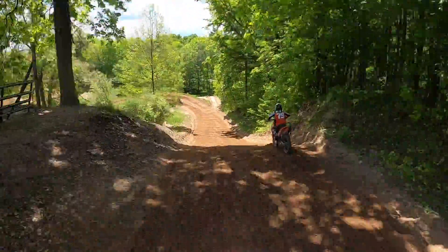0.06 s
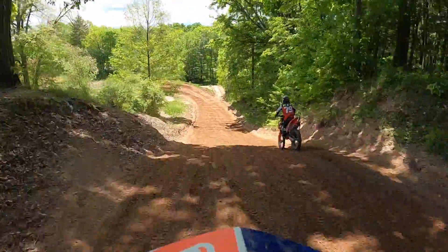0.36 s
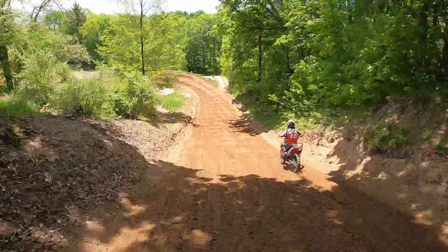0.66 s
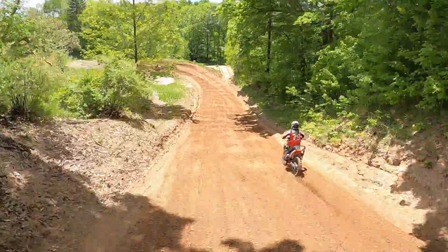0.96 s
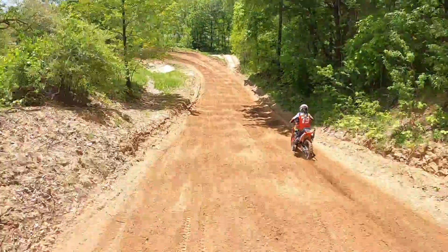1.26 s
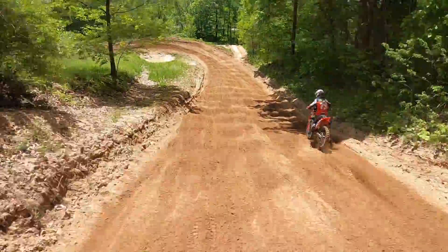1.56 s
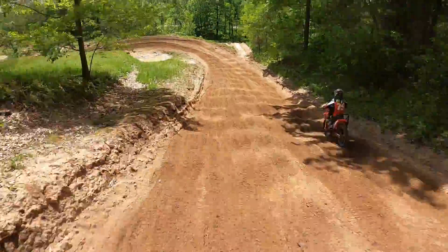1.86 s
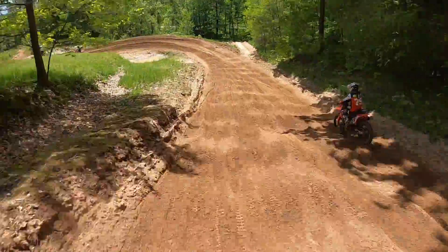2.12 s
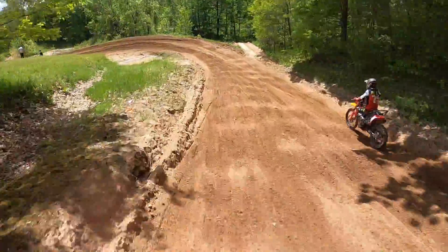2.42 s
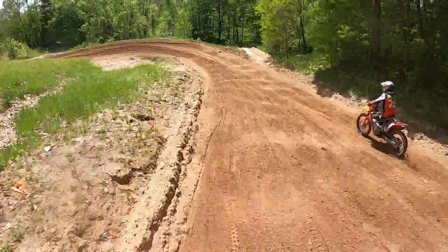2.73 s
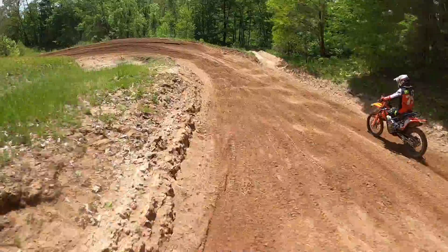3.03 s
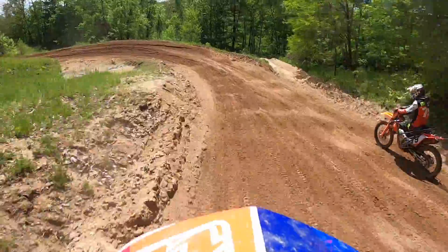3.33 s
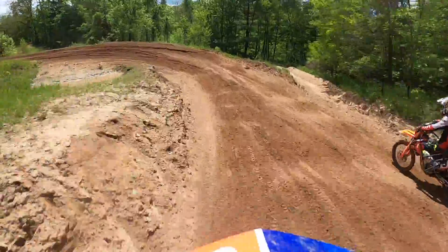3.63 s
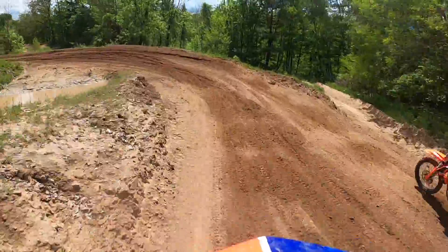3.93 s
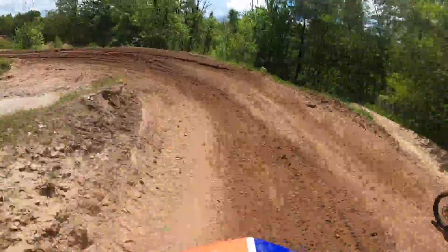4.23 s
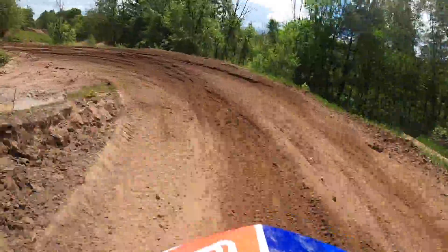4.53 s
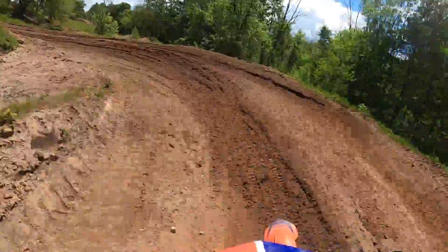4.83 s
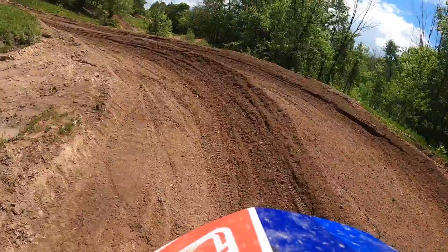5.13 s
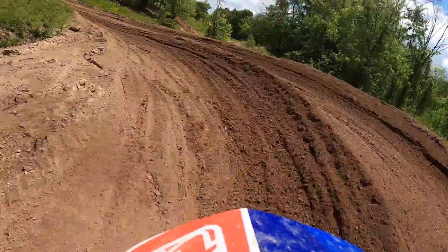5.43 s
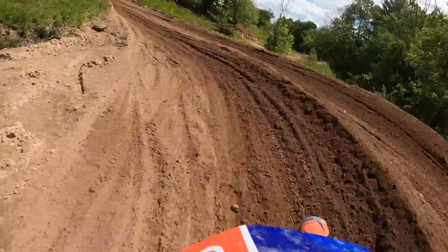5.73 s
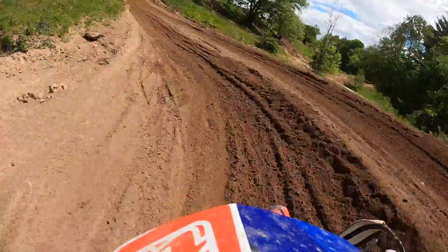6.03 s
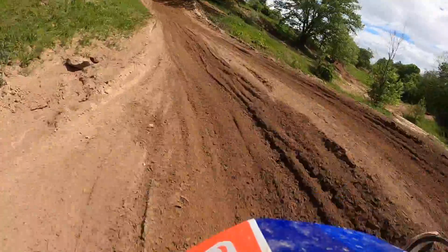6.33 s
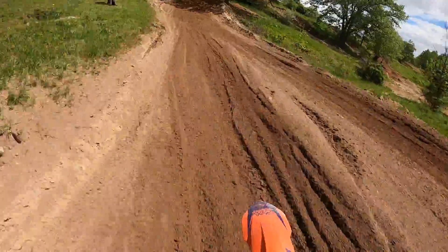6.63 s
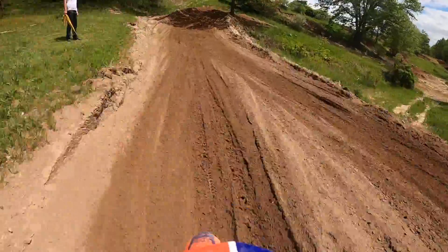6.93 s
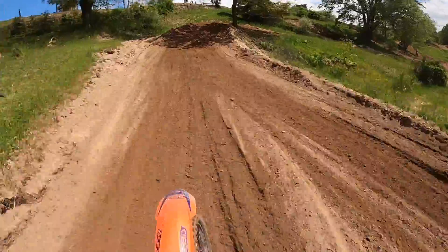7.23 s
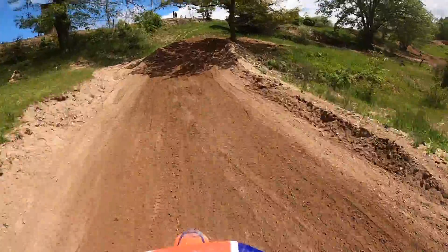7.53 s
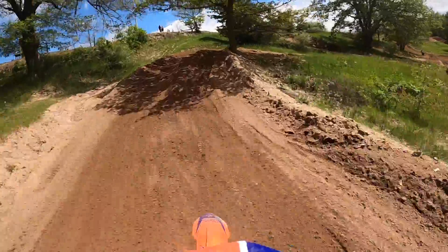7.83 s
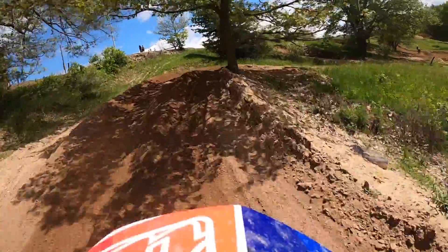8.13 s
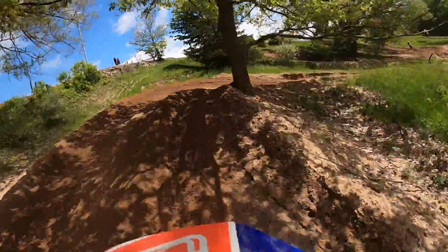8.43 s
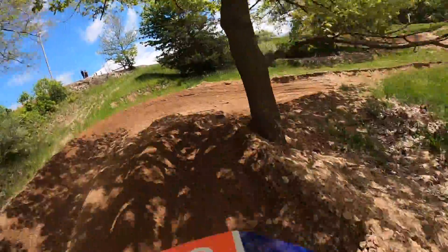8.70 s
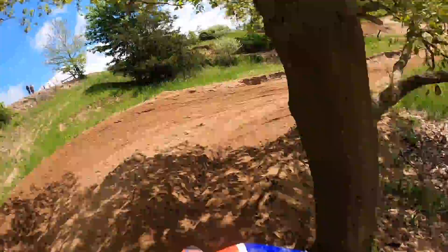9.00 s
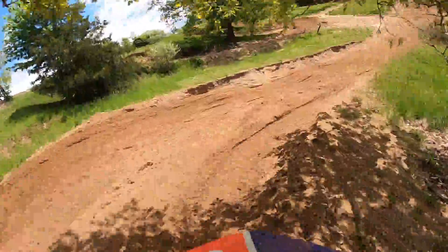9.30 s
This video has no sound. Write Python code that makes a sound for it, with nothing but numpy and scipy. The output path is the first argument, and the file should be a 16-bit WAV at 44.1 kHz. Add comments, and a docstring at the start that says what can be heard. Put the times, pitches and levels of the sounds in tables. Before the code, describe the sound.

A four-stroke dirt bike heard up close coasts with short throttle blips, revs hard, then drops to a thudding idle, with wind and stone ticks.

```python
"""A four-stroke single dirt bike on a trail, heard close from a microphone on the rider's helmet.
It coasts downhill with short blips, powers through a sandy bend, drops to a thudding idle and picks up.
Each firing throbs, rings the pipe and airbox and, under load, cracks out of the silencer.
Below the rider, chain and tyres rush and stones tick on the frame; wind buffets the microphone."""
import sys
import numpy as np
from scipy import signal
from scipy.fft import rfft, irfft, next_fast_len
from scipy.io import wavfile
from scipy.ndimage import uniform_filter1d

SR = 44100
rng = np.random.default_rng(int(sys.argv[2]) if len(sys.argv) > 2 else 0)


def to_wav(s):
    """Save 16-bit WAV."""
    ch = np.atleast_2d(s).T  # columns
    pcm = np.round(np.clip(ch, -1, 1) * 32767)  # PCM
    wavfile.write(sys.argv[1], SR, pcm.astype(np.int16))


N = 421581
TIME = np.arange(N) / SR


def gain_of(db):
    """Decibels to amplitude."""
    return 10 ** (np.asarray(db) / 20)


def curves(rows, along=TIME):
    """A table's later columns, one value a sample, read along time, throttle or engine speed."""
    position, *columns = np.transpose(rows)
    return [np.interp(along, position, column) for column in columns]


def swell(centre_s, length_s, flatness=4):
    """A smooth rise to 1 and back, centred on one moment."""
    return np.exp(-(2 * (TIME - centre_s) / length_s) ** flatness)


def steady(x):
    """Holds the running rms at 1 while single firings keep their shape."""
    power = uniform_filter1d(uniform_filter1d(x ** 2, size=4200), size=2200)
    return x / np.sqrt(abs(power) + 1e-14)


def waver(hz):
    """Random drift of rms 1, up to the given rate."""
    size = next_fast_len(N, True)
    rolloff = 1 + (np.fft.rfftfreq(size, 1 / SR) / hz) ** 4
    drift = irfft(rfft(rng.standard_normal(size)) / rolloff, size)[:N]
    return drift / drift.std()


def colour(x, spectrum, size=4096):
    """Causal filter of unit energy with the given spectral shape."""
    hz, db = np.transpose(spectrum)
    bin_hz = abs(np.fft.fftfreq(size, 1 / SR)) + 1
    log_gain = np.log(gain_of(np.interp(np.log(bin_hz), np.log(hz), db)))
    minimum_phase = np.exp(np.conj(signal.hilbert(log_gain)))
    taps = np.fft.ifft(minimum_phase).real[:size // 2]
    return signal.oaconvolve(x, taps / np.linalg.norm(taps))[:N]


def ring(x, hz, width_hz, skirt_hz):
    """A fixed or moving resonance held at rms 1; a second pole steepens its skirts."""
    carrier = np.exp(2j * np.pi * np.cumsum(hz * np.ones(N)) / SR)
    baseband = x / carrier
    for pole in np.exp(-np.pi * np.array([width_hz, skirt_hz]) / SR):
        baseband = signal.lfilter([1 - pole], [1, -pole], baseband + 1e-18)
    return steady((carrier * baseband).real)


def clicks(start_s, size):
    """Single impulses, each shared between the two samples around its time."""
    at = np.clip(start_s * SR, 0, N - 1)
    whole, part = at.astype(int), at % 1
    before = np.bincount(whole, size * (1 - part), N + 1)
    after = np.bincount(whole + 1, size * part, N + 1)
    return (before + after)[:N]


def blend(first, second, share):
    """Mixes two sounds by the share of power that the second one has."""
    share = np.clip(share, 0, 1)
    return np.sqrt(1 - share) * first + np.sqrt(share) * second


def firings(cycles, rough, lead_cycles=0, lead_ms=0, jitter_ms=.45):
    """One pulse an engine cycle; rough running scatters their time and strength."""
    start_s = np.interp(np.arange(1, int(cycles[-1]) + 1) - lead_cycles, cycles, TIME)
    scatter = np.sqrt(np.interp(start_s, TIME, rough))
    late, strong = rng.standard_normal((len(start_s), 2)).T * scatter
    return clicks(start_s + (jitter_ms * late - lead_ms) / 1000, gain_of(3 * strong))


def puffs(cycles, decay_cycles, floor):
    """Turbulence that flares at each firing and fades towards a steady floor."""
    return (floor + np.exp(-(cycles % 1) / decay_cycles)) * rng.standard_normal(N)


# Wind right on the microphone: freq_hz, level_db
WIND_SPECTRUM = [(8, -15.5), (20, -15.5), (35, -21), (50, -12.5), (100, -11), (200, -9.5), (500, -31.5),
                 (2000, -87)]
# Its gusts: time_s, level_db
GUSTS = [(0, -15), (.25, -20), (.45, -19.5), (2, -17.5), (2.9, -17), (3.3, -21), (4.2, -17), (4.7, -20.5),
         (5.4, -28), (7.7, -29.5), (8.1, -22), (8.6, -19), (9.0, -23), (9.12, -27.5)]

def wind():
    """Lumpy buffeting of air at the helmet."""
    level_db = curves(GUSTS)[0] + 0.45 * waver(2.1)
    return gain_of(level_db) * colour(rng.standard_normal(N), WIND_SPECTRUM, size=16384)


# Larger stones on the frame, below the rider: start_s, level_db, knock_offset_db
STONE_HITS = [(0.3445, -32.5, 7), (0.4194, -26.5, 5.5), (0.4447, -40, 14), (0.466, -50, 5), (1.17, -33, -1),
              (1.6904, -28, -2), (1.9855, -32, 1), (2.128, -29, -6), (2.2774, -35, 7), (2.43, -34, 5),
              (2.652, -31, 1), (2.92, -36, -1), (3.18, -38.5, -17), (4.502, -33.5, 3), (8.35, -31, -4),
              (8.918, -32, 10), (8.997, -42.5, 20), (9.027, -36.5, 11), (2.5578, -23, -8), (2.7222, -26, 2),
              (3.46, -29, -7), (3.5835, -27.5, -12), (3.5954, -28, -14), (3.7394, -29.5, -16),
              (3.9563, -34.5, 6), (4.053, -24.5, -6), (4.206, -30, -1), (4.6933, -31, 2),
              (8.2048, -29, -36), (8.4801, -32, 2), (8.5298, -33, 2), (8.846, -32.5, 10.5),
              (8.9384, -36, -12)]
# Sand thrown at the fender: centre_s, level_db, length_s
SAND_SPRAYS = [(0.426, -34, 0.031), (0.449, -31.5, 0.0099), (2.74, -37, 0.019), (4.069, -42, 0.0061)]
# The bright tick and the lower knock of a hit: freq_hz, level_db
TICK_SPECTRUM = [(600, -50.5), (1800, -19.5), (2600, 12), (3700, 9.5), (5000, -1), (6200, -0.5),
                 (8500, -20), (11000, -24.5), (15000, -31)]
KNOCK_SPECTRUM = [(150, 3.5), (450, -9), (780, 10), (1300, 12.5), (2200, 4.5), (5000, -40)]

def stones(gravel_per_s=2, candidates=100):
    """Stones and random small gravel scrape for milliseconds; sand comes in short sprays."""
    when, size, chance = rng.random((candidates, 3)).T
    gravel = np.column_stack([when * N / SR, -46 + 6 * size, np.full(candidates, 6)])  # as STONE_HITS
    strikes = chance < gravel_per_s * N / SR / candidates
    start_s, level_db, knock_offset_db = np.vstack([STONE_HITS, gravel[strikes]]).T

    def contact(db, decay_s):
        envelope = signal.lfilter([1], [1, -np.exp(-1 / (decay_s * SR))], clicks(start_s, gain_of(db)))
        return envelope * rng.standard_normal(N)

    sprays = sum(gain_of(db) * swell(at, length, flatness=2) for at, db, length in SAND_SPRAYS)
    ticks = contact(level_db - 2, decay_s=.004) + sprays * rng.standard_normal(N)
    knocks = contact(level_db + knock_offset_db - 3.5, decay_s=.021)
    return colour(ticks, TICK_SPECTRUM) + colour(knocks, KNOCK_SPECTRUM)


# The slack chain singing on the overrun, down by the back wheel: time_s, level_db
CHAIN_LEVEL = [(0, -47), (1.65, -44.5), (1.8, -38.5), (2.25, -35.5), (2.7, -38.5), (2.85, -65.5),
               (8.0, -40.5), (8.2, -46.5), (8.8, -35.5), (9.03, -45), (9.12, -49)]

def chain():
    """A fuzzy whine that wavers with the swing of the chain and once tightens into a squeal."""
    pitch_hz = 1410 + 55 * waver(13)
    note = ring(rng.standard_normal(N), pitch_hz, width_hz=240, skirt_hz=600)
    overtone = ring(rng.standard_normal(N), 2640 + 25 * waver(5.8), width_hz=100, skirt_hz=300)
    whine = gain_of(curves(CHAIN_LEVEL)[0] + 2 * waver(25)) * (note + gain_of(-15) * overtone)
    squeal = ring(rng.standard_normal(N), 1290, width_hz=12, skirt_hz=60)
    return whine + gain_of(-32) * swell(centre_s=2.203, length_s=.065) * squeal


# Tyres and chain at ground level: freq_hz, level_db
RUSH_SPECTRUM = [(1200, -20.5), (2200, 0.5), (2700, 5.5), (3300, 2), (4200, -1.5), (5100, -11), (5900, -12),
                 (7200, -17), (8600, -22), (10000, -33), (11500, -51), (14000, -83)]
# Their rise and fall along the trail: time_s, level_db
RUSH_LEVEL = [(0.0, -44), (1.09, -42.5), (1.7, -45), (1.92, -42.5), (2.53, -44.5), (2.8, -47), (4.07, -44),
              (4.21, -49.5), (4.93, -50.5), (5.06, -45.5), (6.28, -48.5), (6.5, -48), (6.71, -51),
              (7.03, -50.5), (7.48, -48), (7.77, -43.5), (8.14, -49.5), (8.84, -45.5), (9.18, -55),
              (9.56, -54)]

def rush(cycles, throttle, boost_db):
    """Gritty hiss of tyres and chain; under load the exhaust chops it into bursts."""
    grit = rng.standard_normal(N) * gain_of(6.2 * waver(5.5) + 1.4 * waver(71) + 0.5 * waver(1500))
    bursts = puffs(cycles, decay_cycles=.082, floor=.041)
    hiss = blend(steady(grit), steady(bursts), 0.49 * throttle)
    return gain_of(curves(RUSH_LEVEL)[0] + boost_db + 1.5) * steady(colour(hiss, RUSH_SPECTRUM))


# Mechanical rattle from under the tank: freq_hz, level_db
CLATTER_SPECTRUM = [(200, 6), (400, 8.5), (500, 2.5), (640, 4), (800, 2), (1020, -2), (1350, -2.5),
                    (1800, -4.5), (2300, -11.5), (3200, -35), (5000, -34.5), (12000, -81)]

def clatter(cycles):
    """Valve gear and slapping chain make an uneven rattle."""
    rattle = puffs(cycles, decay_cycles=.84, floor=7.4) * gain_of(2 * waver(70))
    return steady(colour(rattle, CLATTER_SPECTRUM))


def gas_pulses(cycles, rough, lead_cycles=0, lead_ms=0):
    """One push of gas a cycle, more turbulent as the engine runs rougher."""
    pulses = steady(firings(cycles, rough, lead_cycles, lead_ms))
    return blend(pulses, steady(puffs(cycles, decay_cycles=.7, floor=.36)), rough)


# The airbox under the seat: time_s, pitch_hz, level_db
AIRBOX_DRONE = [(0, 294, -39), (.58, 290, -28.5), (.72, 284, -54), (2.9, 297, -47), (3.15, 318, -31.5),
                (3.36, 308, -30), (3.5, 298, -45), (4.72, 304, -45.5), (4.9, 295, -21.5),
                (5.05, 296, -19.5), (5.14, 305, -38), (5.55, 292, -17.5), (5.9, 292, -17.5),
                (6.05, 298, -18), (6.35, 301, -13), (6.9, 288.5, -13), (7.2, 299, -12), (7.28, 316, -9.5),
                (7.47, 293, -14.5), (7.6, 289.6, -13.5), (7.95, 306, -25), (8.08, 297, -52)]

def airbox(gulps):
    """The airbox drones as the engine draws air through it."""
    pitch_hz, level_db = curves(AIRBOX_DRONE)
    return gain_of(level_db) * ring(gulps, pitch_hz, width_hz=59, skirt_hz=68)


# The engine's growl, about a metre below the microphone: time_s, level_db
GROWL_LEVEL = [(0, -31), (.2, -19.5), (.36, -22), (.58, -26), (.75, -17), (1.25, -20.5), (1.6, -19.5),
               (1.8, -27.5), (2.7, -30.5), (2.9, -23), (3.35, -18.5), (3.55, -39), (4.1, -18.5),
               (4.22, -34), (4.4, -27.5), (4.6, -26), (4.85, -22.5), (5.08, -17.5), (5.15, -20),
               (5.45, -19), (5.6, -36), (5.8, -19.5), (6.0, -22.5), (6.2, -21), (6.33, -31), (6.5, -23),
               (6.9, -23), (7.08, -34.5), (7.45, -28), (7.75, -28), (7.95, -18.5), (8.15, -21),
               (8.6, -29.5), (9.1, -19), (9.56, -23.5)]

def growl(surges, pitch_hz):
    """Surges of gas tied to the crank favour a few harmonics, which rise and fall with the revs."""
    return gain_of(curves(GROWL_LEVEL)[0]) * ring(surges, pitch_hz, width_hz=81, skirt_hz=73)


# The silencer's casing, behind the rider: time_s, level_db
SHELL_LEVEL = [(0, -27.5), (.22, -22.5), (.37, -36), (.46, -24.5), (.58, -26), (.75, -47), (.95, -27.5),
               (1.25, -28), (1.36, -33), (1.6, -29), (1.78, -50), (2.95, -43), (3.14, -27.5), (3.47, -35),
               (3.6, -27), (4.0, -36.5), (4.25, -39), (4.55, -37), (4.85, -23.5), (5.2, -33), (5.9, -39.5),
               (7.75, -45.5), (7.95, -17.5), (8.12, -46), (8.55, -32.5), (9.0, -47)]

def shell(exhaust):
    """Exhaust pulses ring the silencer shell at one pitch."""
    return gain_of(curves(SHELL_LEVEL)[0]) * ring(exhaust, 372, width_hz=55, skirt_hz=70)


# Three resonances at the tail, shifting with gas heat and the rider's posture: time_s, pitch_hz, level_db
OUTLET_HONK = [(0, 524, -35), (.3, 594, -46), (.58, 636, -36), (.8, 644, -49), (2.9, 610, -44.5),
               (3.12, 580, -43), (3.33, 670, -33.5), (3.48, 620, -40), (4.1, 600, -51), (4.33, 560, -37.5),
               (4.55, 590, -44), (4.78, 635, -35), (5.25, 573, -34.5), (5.65, 520, -32.5), (5.95, 520, -40),
               (6.1, 490, -33.5), (6.6, 514, -40.5), (6.78, 510, -46), (7.16, 506, -29.5),
               (7.32, 500, -39.5), (7.4, 500, -52), (7.6, 533, -42.5), (8.1, 525, -42), (8.3, 540, -34),
               (9.4, 480, -52), (9.52, 540, -27)]
OUTLET_BLARE = [(0, 960, -40), (.2, 1050, -46), (.35, 1053, -62.5), (4.65, 1028, -52), (4.8, 1090, -44),
                (5.1, 930, -44.5), (5.24, 980, -42), (5.38, 1160, -26.5), (5.65, 815, -50),
                (5.85, 1065, -37), (6.25, 1100, -32), (6.62, 1060, -39.5), (6.72, 765, -37.5),
                (6.95, 770, -42.5), (7.2, 890, -39.5), (7.33, 747, -35.5), (7.48, 810, -40),
                (7.58, 1020, -35), (7.8, 1060, -35), (8.0, 1150, -42), (8.1, 1100, -60)]
OUTLET_RASP = [(0, 1390, -42), (.24, 1690, -34), (.35, 1690, -59.5), (4.85, 1590, -64.5),
               (5.02, 1640, -33.5), (5.15, 1420, -48), (5.4, 1355, -36), (5.65, 1390, -42),
               (5.87, 1310, -32), (6.1, 1275, -47), (6.351, 1350, -31.5), (6.45, 1330, -40),
               (6.58, 1300, -26), (6.749, 1380, -44), (7.15, 1170, -41.5), (7.321, 1280, -35),
               (7.45, 1310, -51), (7.7, 1260, -42), (7.92, 1580, -30), (8.08, 1600, -57)]

def outlet(cycles, rough):
    """Each blowdown rings the exhaust outlet, lifting a few harmonics above the rest."""
    crack = steady(firings(cycles, rough + .12, lead_ms=.4, jitter_ms=.06))
    gas = steady(puffs(cycles, decay_cycles=.15, floor=.04))
    blowdown = blend(crack, gas, .03)
    resonances = map(curves, (OUTLET_HONK, OUTLET_BLARE, OUTLET_RASP))
    return sum(gain_of(db) * ring(blowdown, hz, width_hz=125, skirt_hz=450) for hz, db in resonances)


# The exhaust crack as it reaches the helmet: freq_hz, level_db
BARK_SPECTRUM = [(200, -20), (380, -9), (500, 1.5), (620, 1.5), (740, 6), (900, 2.5), (1100, 2.5),
                 (1400, -1), (1800, -2), (2300, -12), (3000, -19), (4200, -35.5), (6000, -61.5),
                 (12000, -81.5)]
# Near reflections off bike and ground, swaying as the rider moves: delay_ms, level_db, sway_ms
REFLECTIONS = [(0.8, -3, 0.15), (1.899, -8, 0.31), (3.9, -2, 0.28)]

def bark(cycles, rough):
    """The sharp crack of each blowdown, its shifting reflections and a trailing puff of gas."""
    crack = firings(cycles, rough + .06, lead_ms=.4, jitter_ms=.05)
    echoes = np.zeros(N)
    for delay_ms, level_db, sway_ms in REFLECTIONS:
        delay_s = (delay_ms + sway_ms * waver(4.65)) / 1000
        echoes += gain_of(level_db) * np.interp(TIME - delay_s, TIME, crack, left=0)
    gas = steady(puffs(cycles, decay_cycles=.25, floor=.1))
    return steady(colour(blend(steady(crack + echoes), gas, .018), BARK_SPECTRUM))


# Bark and clatter together, the midrange at the helmet: time_s, level_db
EDGE_LEVEL = [(0.0, -26), (0.02, -32), (1.04, -31), (2.23, -33.5), (3.05, -34.5), (3.14, -36.5),
              (3.24, -37), (3.8, -35.5), (3.83, -33.5), (4.63, -37.5), (4.79, -33.5), (4.93, -37),
              (5.24, -26.5), (5.59, -25.5), (5.88, -24), (6.23, -24), (6.65, -19), (6.76, -25), (7.14, -21),
              (7.51, -29.5), (7.56, -24), (7.96, -30), (8.07, -33), (9.0, -34), (9.1, -36), (9.4, -38),
              (9.56, -28.5)]

def engine_edge(cycles, rough, throttle, boost_db):
    """Clatter shows on a shut throttle and gives way to the bark as it opens."""
    clatter_share = .002 + .998 * np.exp(-(throttle / .085) ** 2)
    edge = blend(gain_of(-12.5) * bark(cycles, rough), gain_of(13.5) * clatter(cycles), clatter_share)
    return gain_of(curves(EDGE_LEVEL)[0] + boost_db) * edge


# Notes of the exhaust beside the rider's leg, by engine speed: firing_hz, pipe_hz, silencer_hz
EXHAUST_TUNING = [(20, 250, 307), (29.8, 125, 298), (41, 143, 261), (51, 192, 277.6), (58.5, 152, 259.4),
                  (73, 227, 261.5)]
# The silencer's thump: time_s, level_db
THUMP_LEVEL = [(0, -24), (.35, -18.5), (.58, -24), (.8, -49), (1.3, -39), (1.6, -31.5), (2.6, -29),
               (3.2, -20.5), (3.6, -18), (4.1, -26.5), (4.25, -17.5), (4.6, -26), (4.78, -12.5), (4.9, -32),
               (5.05, -21.5), (5.3, -18.5), (5.55, -13.5), (6.2, -18.5), (6.5, -12.5), (6.85, -23),
               (7.15, -14), (7.3, -21), (7.55, -14), (7.9, -12), (8.15, -44), (8.6, -18.5), (8.75, -28),
               (8.87, -19), (9.05, -20.5), (9.4, -21.5), (9.56, -16.5)]
# The engine skips or barely fires on a shut throttle: centre_s, length_s, dip_db
MISFIRES = [(0.436, 0.18, -22), (4.172, 0.074, -14), (8.517, 0.072, -9), (8.77, 0.18, -5),
            (8.917, 0.056, -5.5), (8.992, 0.036, -19)]

def pipe_and_silencer(exhaust, firing_hz, pipe_db):
    """Exhaust pulses ring the pipe and, in opposite polarity, the silencer; misfires duck both."""
    pipe_hz, silencer_hz = curves(EXHAUST_TUNING, along=firing_hz)
    pipe = gain_of(pipe_db) * ring(exhaust, pipe_hz, width_hz=63, skirt_hz=215)
    thump = gain_of(curves(THUMP_LEVEL)[0]) * ring(exhaust, silencer_hz, width_hz=101, skirt_hz=145)
    dip_db = sum(db * swell(at, length) for at, length, db in MISFIRES)
    return gain_of(dip_db) * (pipe - thump)


def throb(flow, level_db):
    """The pulsing gas flow makes the deep beat of the engine."""
    return gain_of(level_db) * ring(flow, 79.3, width_hz=59, skirt_hz=46.3)


def roughness(firing_hz, throttle, idle_hz=17):
    """Firing is ragged on the overrun and evens out under load or near idle."""
    above_idle = np.clip((firing_hz - idle_hz) / 2.8, .08, 1)
    return .001 + .09 * above_idle * np.exp(-throttle / .04)


# Engine speed along the trail: time_s, firing_hz
ENGINE_SPEED = [(0.0, 41), (0.04, 37), (0.08, 46), (0.12, 51.5), (0.16, 56), (0.2, 64), (0.28, 62),
                (0.32, 62.3), (0.36, 54.23), (0.4, 55.0), (0.64, 44.18), (0.68, 47.6), (0.8, 41.75),
                (1.04, 37.46), (1.08, 39.07), (1.28, 37.6), (1.32, 38), (1.4, 43.6), (1.64, 56.82),
                (1.68, 49.35), (2.0, 48.43), (2.16, 50.73), (2.68, 49.67), (2.76, 48), (2.8, 48),
                (2.88, 44.62), (3.04, 51.37), (3.24, 49), (3.28, 50), (3.36, 52.5), (3.52, 39.33),
                (3.68, 35.33), (3.88, 36.08), (3.96, 28.36), (4.12, 28.0), (4.24, 24.52), (4.32, 37.41),
                (4.36, 39.64), (4.4, 50.44), (4.56, 43.48), (4.68, 41.99), (4.72, 51.17), (4.76, 49.07),
                (4.88, 62.07), (5.08, 64.02), (5.12, 57.49), (5.16, 58.74), (5.24, 72.14), (5.28, 61.54),
                (5.4, 69.76), (5.52, 45.87), (5.68, 42.54), (5.76, 48.94), (5.8, 58.69), (5.88, 69.84),
                (6.0, 49.17), (6.16, 49.49), (6.28, 52.15), (6.36, 66.32), (6.44, 74.95), (6.56, 68.93),
                (6.6, 64.05), (6.64, 66.51), (6.72, 52.86), (6.88, 48.4), (6.93, 50.7), (7.07, 61),
                (7.11, 60.5), (7.15, 63.2), (7.19, 59.6), (7.235, 62), (7.27, 56.1), (7.43, 51.5),
                (7.5, 54.1), (7.6, 68), (7.64, 69.2), (7.68, 67.2), (7.76, 75.8), (7.84, 66.87),
                (7.88, 66.95), (8.0, 53.39), (8.04, 55.88), (8.12, 45.33), (8.2, 46.32), (8.36, 37.26),
                (8.56, 30.72), (8.84, 27.75), (8.88, 24.38), (9.06, 21.8), (9.39, 20.3), (9.44, 25.5),
                (9.56, 54)]
# The rider's wrist: time_s, opening (0-1)
THROTTLE = [(0, .16), (.22, .2), (.36, .03), (.47, .03), (.55, .11), (.7, 0), (1.35, 0), (1.58, .1),
            (1.75, .04), (2.7, .05), (3.03, .07), (3.11, .16), (3.36, .14), (3.5, .01), (4.15, 0),
            (4.4, .06), (4.7, .05), (4.76, .19), (5.3, .22), (5.5, .4), (5.9, .33), (6.2, .38), (6.35, .52),
            (7.2, .52), (7.33, .7), (7.47, .65), (7.58, .48), (7.85, .42), (8.0, .2), (8.1, .04),
            (9.44, .01), (9.5, .2), (9.56, .3)]
# How the throttle voices the bike, with throb and pipe given at CRUISE_HZ:
# opening (0-1), throb_db, pipe_db, growl_multiple (of firing_hz), edge_boost_db, rush_boost_db
VOICING = [(0, -25.5, -16.5, 4.3, -11, -2.5), (.05, -31, -16, 4.6, -8.5, 0.5),
           (.1, -25, -20.5, 5.4, -4, -2), (.2, -19.5, -29, 5.7, 13, -1), (.38, -21, -27, 5.4, 8, -3.5),
           (.52, -20, -32, 5.0, 6.5, 1.5), (.7, -23, -37, 5.8, 1.5, -1.5)]
CRUISE_HZ = 65

def scene():
    """The ride in mono at the helmet: engine speed times the firings and the throttle voices them."""
    firing_hz = curves(ENGINE_SPEED)[0]
    throttle = np.clip(curves(THROTTLE)[0], .005, .99)
    cycles = .497 + np.cumsum(firing_hz) / SR
    octaves = np.log2(firing_hz / CRUISE_HZ)
    rough = roughness(firing_hz, throttle)
    throb_db, pipe_db, growl_multiple, edge_boost_db, rush_boost_db = curves(VOICING, along=throttle)

    exhaust = gas_pulses(cycles, rough, lead_ms=.1)
    flow = gas_pulses(cycles, rough, lead_ms=1.2)
    gulps = gas_pulses(cycles, rough, lead_cycles=.488, lead_ms=-1.2)  # intake comes before exhaust
    surges = gas_pulses(cycles, rough, lead_cycles=.15)
    engine = (throb(flow, throb_db - 0.5 * octaves)
              + pipe_and_silencer(exhaust, firing_hz, pipe_db + 12 * octaves)
              - shell(exhaust)
              + airbox(gulps)
              + growl(surges, growl_multiple * firing_hz)
              + outlet(cycles, rough)
              + engine_edge(cycles, rough, throttle, edge_boost_db))
    return (engine + rush(cycles, throttle, rush_boost_db) + chain() + stones() + wind())[None]


def record(dry):
    """The helmet microphone blocks the deepest sway, rounds off the highest peaks and limits the band."""
    low_hz, high_hz, ceiling = 8, 14000, .85
    blocked = signal.sosfilt(signal.butter(1, low_hz, "highpass", fs=SR, output="sos"), dry)
    rounded = blocked / (1 + (blocked / ceiling) ** 8) ** (1 / 8)
    lowpass = signal.firwin(255, high_hz, window=("kaiser", 9), fs=SR)
    return signal.oaconvolve(rounded, lowpass[None], "same")


dry = scene()
out = record(dry)
to_wav(out)
```